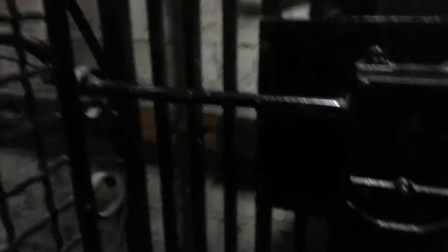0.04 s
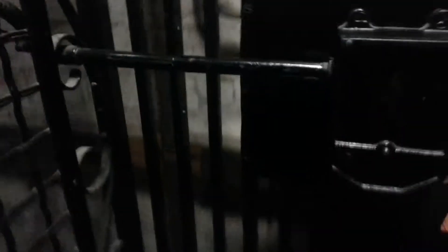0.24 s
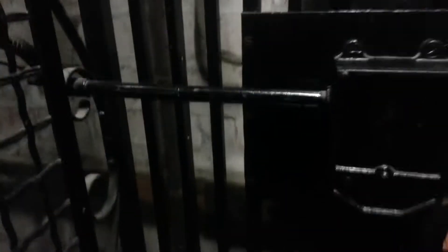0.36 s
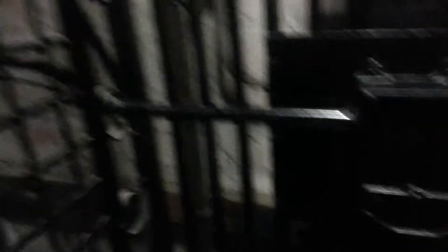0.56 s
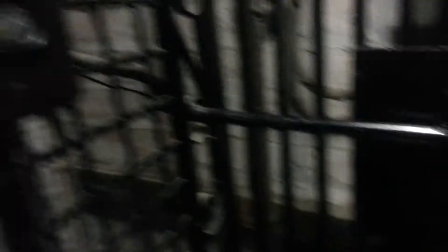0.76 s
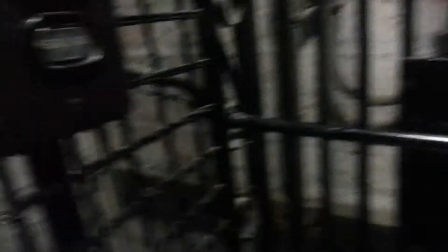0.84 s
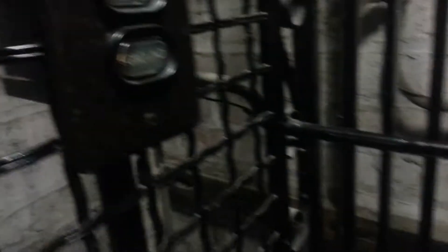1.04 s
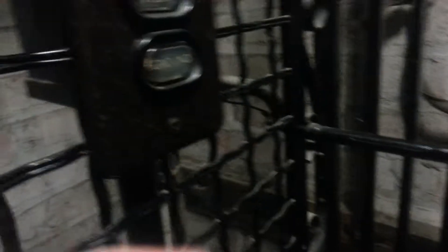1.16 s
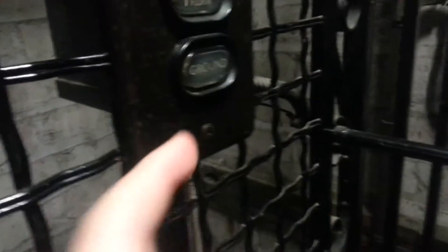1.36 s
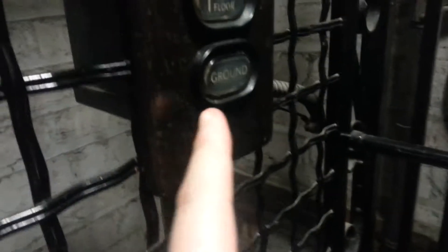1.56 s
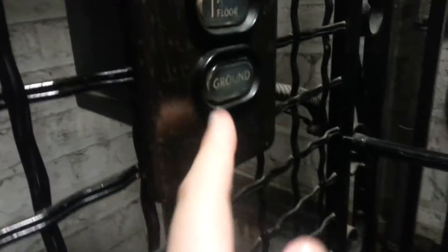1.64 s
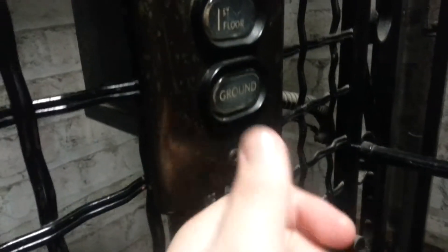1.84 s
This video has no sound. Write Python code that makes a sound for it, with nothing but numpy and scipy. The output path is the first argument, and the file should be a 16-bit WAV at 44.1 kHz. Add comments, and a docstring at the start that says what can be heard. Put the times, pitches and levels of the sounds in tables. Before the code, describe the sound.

A steel lattice gate slides shut with a scraping rumble, a ringing thud, sharp clacks and brief squeaks. It dies away, and one small tick follows over a faint low hum, heard from inside an old lift cabin.

```python
"""A steel lattice gate is slid shut inside an old lift cabin. Its rollers rumble and scrape along
a gritty track, the frame thuds and rings, and the bars clack together; a last clack latches it.
Dry pivots stick and slip, which makes them squeak, and there are a few light taps.
Then comes one small tick over the steady hum of the shaft."""
import sys
import numpy as np
from scipy import signal
from scipy.fft import rfft, irfft, next_fast_len
from scipy.io import wavfile
from scipy.ndimage import map_coordinates

SR = 44100
rng = np.random.default_rng(int(sys.argv[2]) if len(sys.argv) > 2 else 0)


def wav_out(sig):
    """Save sig, one row per channel (or a flat mono array), as 16-bit PCM at SR to the path in sys.argv[1]."""
    wavfile.write(sys.argv[1], SR, np.round(np.clip(np.atleast_2d(sig).T, -1, 1) * 32767).astype(np.int16))


N = 83790  # 1.9 s


def amp(db):
    """Turn decibels into a number to multiply by."""
    return 10 ** (np.asarray(db) / 20)


def along(points, hz):
    """Read a (frequency, value) table at any frequency, gliding between its rows."""
    freqs, values = np.transpose(points)
    return np.interp(np.log(hz + 1), np.log(freqs + 1), values)


def wobble(per_s, size):
    """A smooth curve through per_s random points a second."""
    return map_coordinates(rng.standard_normal(size), [np.arange(size) * per_s / SR], mode="wrap")


def pan(db):
    """Left and right gains that make the left side louder by db."""
    return amp(np.array([[.5], [-.5]]) * db)


def add(out, start, sound):
    """Mix a sound into out at a start time in seconds."""
    i = max(round(start * SR), 0)
    out[:, i:i + sound.shape[1]] += sound[:, :N - i]


def fade(t, ring_s):
    """Die away by 60 dB over the ring time."""
    return np.exp(-np.log(1000) * t / np.maximum(ring_s, 1e-3))


# How alike left and right sound in the cabin: (frequency [Hz], likeness [1 = same, 0 = unrelated])
LIKENESS = [(40, .55), (130, .96), (320, .9), (500, .5), (1000, .03), (4000, -.05), (12000, 0)]
# Which side is louder: (frequency [Hz], left minus right [dB])
SIDE_BALANCE = [(300, 0.2), (1200, 0.5), (2500, -0.5), (4000, -5), (8000, 0.5), (12000, 0)]

def coloured(pair, gain_db):
    """Give two unrelated noises a tone colour and the cabin's stereo spread, at a standard level."""
    n = pair.shape[1]
    size = next_fast_len(n + 2048)
    hz = np.fft.rfftfreq(size, 1 / SR)
    spread = np.arccos(np.clip(along(LIKENESS, hz), -1, 1)) / 2
    mid, side = rfft(pair, size) * amp(gain_db(hz)) * [np.cos(spread), np.sin(spread)]
    left_right = np.array([mid + side, mid - side]) * pan(along(SIDE_BALANCE, hz))
    sound = irfft(left_right, size)[:, :n]
    return sound / np.sqrt(np.mean(sound ** 2) + 1e-20)


def clatter(colour, ring_times, brightness, attack_s, crack_db, crack_s):
    """One blow: a short crack, then gate and cabin ring, each frequency dying at its own speed."""
    t = np.arange(SR) / SR
    noise = rng.standard_normal((2, SR))
    noise = coloured(noise, lambda hz: along(colour, hz) + brightness * np.log2(np.maximum(hz, 150)))
    hz, when, bands = signal.stft(noise, SR, nperseg=256)
    bands *= fade(when, along(ring_times, hz)[:, None])
    ring = signal.istft(bands, SR, nperseg=256)[1][:, :SR]
    attack = 1 - np.exp(-t / attack_s)
    crack = 1 + amp(crack_db) * np.exp(-t / crack_s)
    return ring * attack * crack


# Tone colour of the shaft: (frequency [Hz], relative level [dB])
SHAFT_COLOUR = [(25, -24), (60, -13.5), (95, -17), (125, -5), (158, 2), (200, -5.5), (320, -5.5),
                (420, -8.5), (600, -12), (950, -10.5), (1500, -17), (3200, -19.5), (4800, -20),
                (6000, -25.5), (14500, -24.5)]

def shaft_hum():
    """The lift shaft hums low and steady, with a faint hiss."""
    return amp(-52.5) * coloured(rng.standard_normal((2, N)), lambda hz: along(SHAFT_COLOUR, hz))


# Light taps, the ring of one frame knock (second row) and the closing tick (last row):
# (time [s], level [dB], pitch [Hz], width [octaves], ring time [s])
TAPS_AND_RINGS = [(.042, -27, 1130, 0.76, 0.18), (.658, -22.5, 1020, 0.13, 0.24),
                  (1.101, -55.5, 1750, .5, 0.49), (1.439, -39, 1650, 0.3, 0.036)]

def taps_and_rings():
    """Light taps, one frame knock and the closing tick each ring in one band of frequencies."""
    out, t = np.zeros((2, N)), np.arange(SR // 2) / SR
    attack = 1 - np.exp(-t / 0.00065)
    for start, db, pitch, width, ring_s in TAPS_AND_RINGS:
        noise = rng.standard_normal((2, len(t)))
        band = coloured(noise, lambda hz: -14 * np.log10(1 + (np.log2((hz + 1) / pitch) / width) ** 4))
        add(out, start, amp(db) * band * fade(t, ring_s) * attack)
    return out


# The tones in one squeak: (multiple of the pitch, relative level [dB])
SQUEAK_TONES = [(1, 1.5), (2, -23), (3, -32), (4, -44)]
# Where those tones sit: (frequency [Hz], left minus right [dB])
SQUEAK_SIDES = [(3500, -4.5), (4500, -8.5), (8000, -4)]
# Each squeak: (time [s], length [s], pitch [Hz], level [dB], roughness [0-1], echo time [s])
PIVOT_SQUEAKS = [(.259, .022, 4960, -26.5, .8, .45), (.628, .019, 4540, -8.5, .55, .2),
                 (.644, .02, 4560, -24, .7, .35), (.672, .015, 3480, -18.5, .55, .35),
                 (.695, .04, 3480, -29, .6, .3), (.763, .02, 3500, -34, .6, .3),
                 (.812, .024, 4480, -24, .9, .22), (.843, .042, 3545, -25, .45, .35)]

def pivot_squeaks(grip_s=.008, slip_s=.005, flutter_db=3, jitter_hz=400, echo_db=-4.5):
    """Dry pivots stick and slip: short fluttering whistles that linger in the cabin."""
    out, t = np.zeros((2, N)), np.arange(SR // 2) / SR
    sides = np.array([[0], [np.pi / 2]])  # left and right are a quarter cycle apart
    for start, length, hz, db, roughness, echo_s in PIVOT_SQUEAKS:
        shape = np.clip(t / grip_s, 0, 1) * np.clip((length - t) / slip_s, 0, 1)
        loudness = shape * amp(flutter_db * wobble(per_s=300, size=len(t)))
        loudness *= np.linalg.norm(shape) / np.linalg.norm(loudness)  # flutter adds no energy
        jitter = np.tanh(wobble(per_s=700, size=len(t)))
        jitter -= np.average(jitter, weights=loudness ** 2)  # keeps the pitch centred
        phase = 2 * np.pi * np.cumsum(hz + roughness * jitter_hz * jitter) / SR
        whistle = loudness * sum(
            amp(level) * pan(along(SQUEAK_SIDES, k * hz)) * np.sin(k * phase + sides)
            for k, level in SQUEAK_TONES)
        cabin = rng.standard_normal((2, len(t))) * fade(t, echo_s)
        echo = signal.fftconvolve(whistle, cabin, axes=1)[:, :len(t)]
        echo /= np.linalg.norm(echo, axis=1, keepdims=True)
        echo *= np.linalg.norm(whistle, axis=1, keepdims=True)
        add(out, start, amp(db) * (whistle + amp(echo_db) * echo))
    return out


# Tone colour of the bars: (frequency [Hz], relative level [dB])
BAR_COLOUR = [(100, -47), (400, -16.5), (1000, -11.5), (1800, -8), (2700, -5.5), (3600, 2.5), (4300, 4.5),
              (5000, -3.5), (6200, -13.5), (8500, -24.5), (11000, -27), (15000, -75.5)]
# How long they ring: (frequency [Hz], ring time [s])
BAR_RING = [(300, 0.32), (1500, 0.38), (4000, 0.22), (7000, 0.25), (13000, 0.06)]
# Bar hitting bar: (time [s], level [dB], added brightness [dB per octave])
BAR_HITS = [(.103, -30, -5.5), (0.117, -32, -1.5), (0.312, -24, 9.5), (.37, -16, -5.5), (0.4471, -15.5, 2),
            (0.5277, -22.5, 3), (0.6097, -23.5, 1), (.695, -22.5, 4.5), (.728, -33, -9), (0.792, -30.5, 3),
            (.994, -32.5, -1)]

def bar_clacks():
    """Flat bars snap against each other as the lattice stretches."""
    out = np.zeros((2, N))
    for start, db, brightness in BAR_HITS:
        clack = clatter(BAR_COLOUR, BAR_RING, brightness, attack_s=0.00043, crack_db=-8, crack_s=0.0097)
        add(out, start, amp(db) * clack)
    return out


# The frame's natural notes: (pitch [Hz], relative level [dB], ring time [s])
FRAME_NOTES = [(227, -11, .3), (290, -9, .25), (328, -14, .65), (341, -2, .21), (430, 0, .22),
               (517, -7, .21), (586, -12, .2), (743, -14, .2), (827, -9, .22), (892, -12, .22),
               (966, -13, .22), (1044, -12, .22), (1355, -11, .21), (2252, -17, .2)]

def frame_ring(jolt_s=.317, jolt_db=-8, swell_s=.018):
    """The hardest jolt builds up the frame's own notes, which ring on."""
    out, t = np.zeros((2, N)), np.arange(SR) / SR
    hz, note_db, ring_s = np.transpose(FRAME_NOTES)
    swell = 1 - np.exp(-t / swell_s)
    notes = np.exp(2j * np.pi * hz[:, None] * t) * fade(t, ring_s[:, None]) * swell
    sides = np.arccos(np.clip(along(LIKENESS, hz), -1, 1)) * np.array([[.5], [-.5]])
    phases = 2 * np.pi * rng.random(len(hz)) + sides
    weights = amp(jolt_db + note_db) * np.exp(1j * phases)
    add(out, jolt_s, (weights @ notes).real)
    return out


# Tone colour of a knock: (frequency [Hz], relative level [dB])
KNOCK_COLOUR = [(30, -47.5), (95, -29.5), (130, -2), (220, -5), (330, -8.5), (450, 1), (650, -3), (900, 1),
                (1300, -6.5), (1800, -17.5), (2400, -6), (3600, -9.5), (5000, -23.5), (7000, -22.5),
                (11000, -51), (15000, -69)]
# How long it rings: (frequency [Hz], ring time [s])
KNOCK_RING = [(70, 0.44), (150, 0.24), (400, 0.44), (1000, 0.38), (4000, 0.13), (10000, .18)]
# Knocks on the frame: (time [s], relative level [dB], added brightness [dB per octave])
FRAME_KNOCKS = [(.288, -27.5, -4.5), (.310, -20, -1), (.327, -17.5, 3), (.342, -22, 1.5), (.361, -22.5, -1),
                (0.377, -27.5, -1.5), (0.45, -29.5, -0.5), (0.572, -37.5, -4), (.621, -26.5, 0),
                (0.661, -27.5, 7), (0.797, -42.5, 1.5), (1.032, -53, -6)]

def frame_thuds():
    """The heavy frame knocks in its track."""
    out = np.zeros((2, N))
    for start, db, brightness in FRAME_KNOCKS:
        thud = clatter(KNOCK_COLOUR, KNOCK_RING, brightness, attack_s=.0031, crack_db=6.5, crack_s=.015)
        add(out, start, amp(db) * thud)
    return amp(-4.5) * out


# Tone colours of the panels and of the steel: (frequency [Hz], relative level [dB])
RUMBLE_COLOUR = [(30, -51.5), (100, -34), (135, -24), (190, -10), (230, -4), (260, -4.5), (300, 0.5),
                 (340, 0.5), (390, -8), (470, -3.5), (580, -12.5), (700, -12), (1500, -23.5), (5000, -76)]
SCRAPE_COLOUR = [(100, -35), (450, -4.5), (1200, 5), (1800, -0.5), (2500, -0.5), (3600, 1), (4800, -8),
                 (6000, -17.5), (9000, -21), (11500, -35), (15000, -64)]
# The gate rolls, stops and shudders out: (time [s], rumble level [dB], scrape level [dB])
GATE_TRAVEL = [(0, -35, -52.5), (.095, -39, -45.5), (0.123, -38.5, -33), (.2, -33.5, -30),
               (.25, -30.5, -25.5), (.3, -26, -24), (0.358, -22.5, -16.5), (0.418, -28, -31.5),
               (.59, -31, -34.5), (0.698, -30.5, -25.5), (.8, -32, -39), (.87, -38.5, -45.5),
               (.98, -43.5, -53.5), (1.13, -47.5, -56.5), (1.22, -52, -60), (1.9, -70, -85.5)]

def gate_rollers(grains_per_s=700, grain_spread_db=1.5):
    """Rollers bump over the gritty track: tiny impacts rumble in the panels and scrape in the steel."""
    t = np.arange(N) / SR
    times, rumble_db, scrape_db = np.transpose(GATE_TRAVEL)
    rumble = coloured(rng.standard_normal((2, N)), lambda hz: along(RUMBLE_COLOUR, hz))
    grains = (rng.random(N) < grains_per_s / SR) * amp(grain_spread_db * rng.standard_normal(N))
    steel_ring = rng.standard_normal((2, SR // 4)) * fade(t[:SR // 4], ring_s=0.08)
    grains *= rng.choice([-1, 1], N)  # each grain pushes or pulls
    grit = signal.fftconvolve(grains[None], steel_ring, axes=1)[:, :N]
    scrape = coloured(grit, lambda hz: along(SCRAPE_COLOUR, hz))
    return rumble * amp(np.interp(t, times, rumble_db)) + scrape * amp(np.interp(t, times, scrape_db))


def scene():
    """Everything heard from inside the cabin."""
    gate = gate_rollers() + frame_thuds() + frame_ring() + bar_clacks()
    # cut the deep bass from the gate's sounds
    bass_cut = signal.butter(4, 107, "highpass", fs=SR, output="sos")
    return signal.sosfilt(bass_cut, gate) + taps_and_rings() + pivot_squeaks() + shaft_hum()


def record(dry, top_hz=15300):
    """Cut away the very highest treble."""
    size = next_fast_len(N + SR // 4)
    kept = np.fft.rfftfreq(size, 1 / SR) < top_hz
    return irfft(rfft(dry, size) * kept, size)[:, :N]


dry = scene()
out = record(dry)
wav_out(out)
```